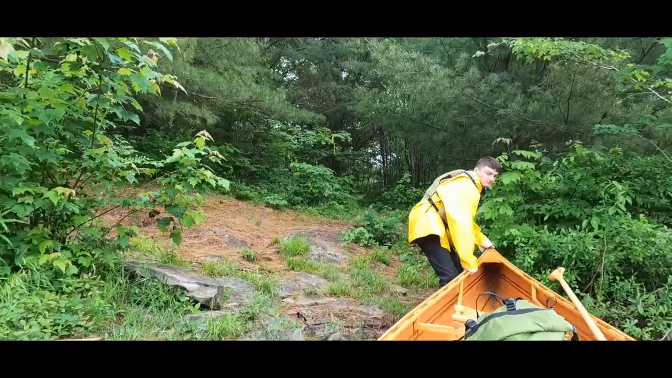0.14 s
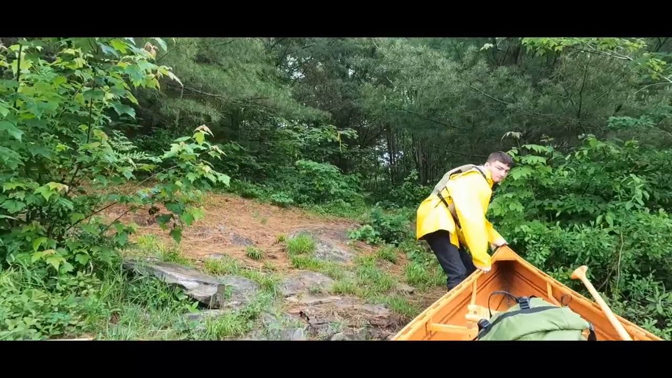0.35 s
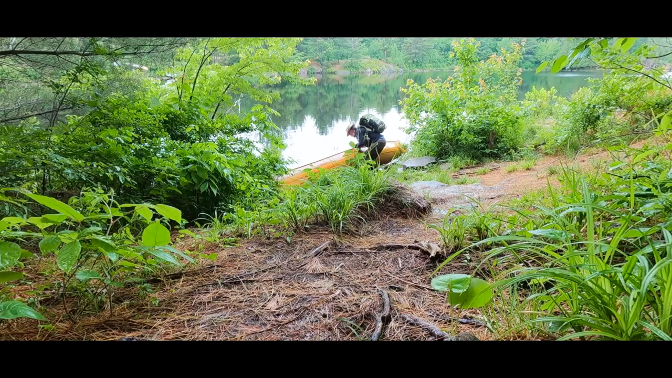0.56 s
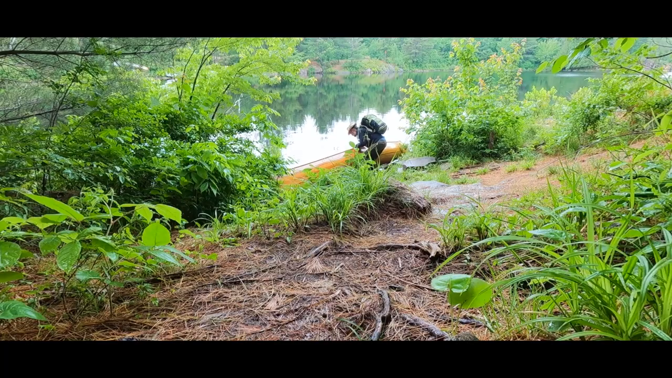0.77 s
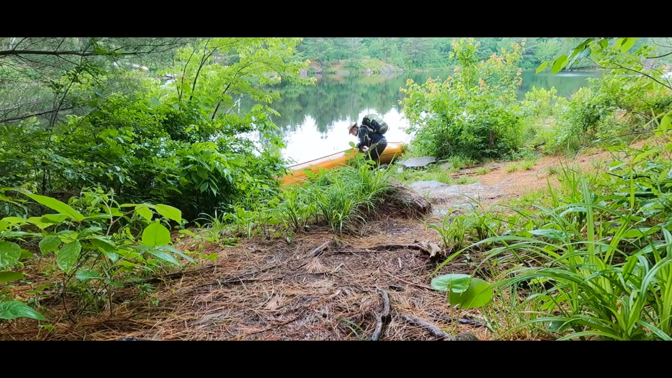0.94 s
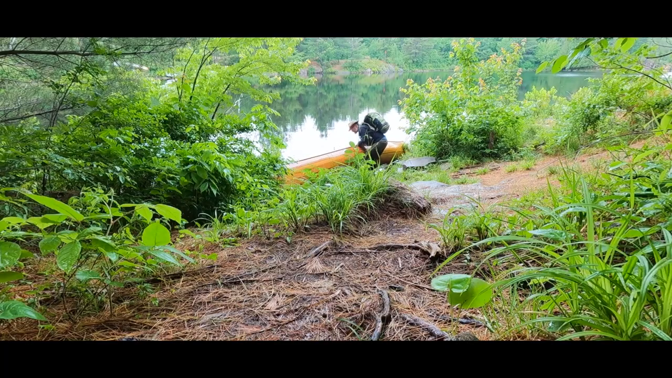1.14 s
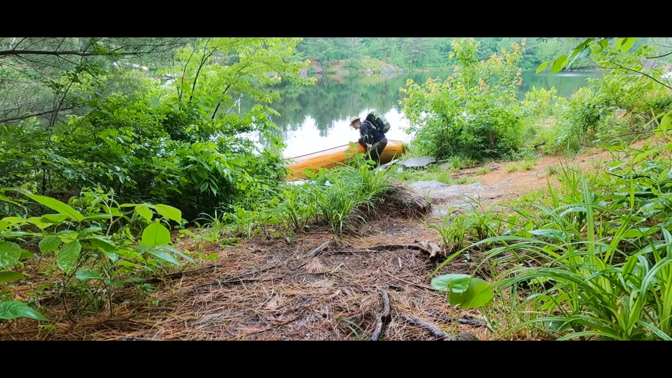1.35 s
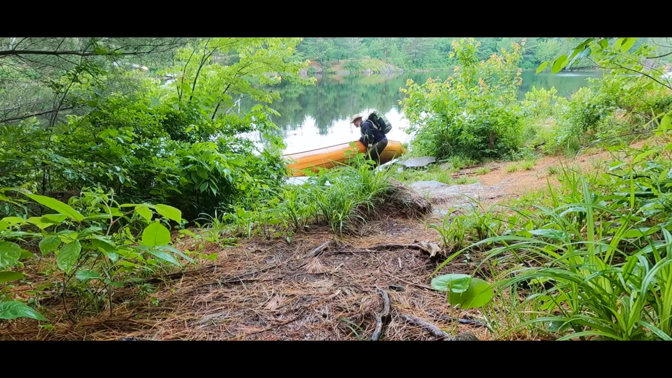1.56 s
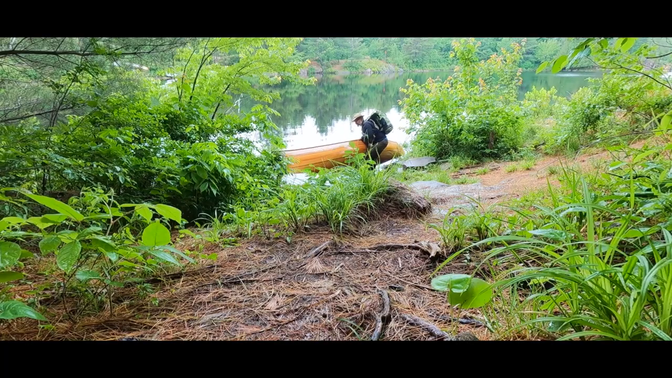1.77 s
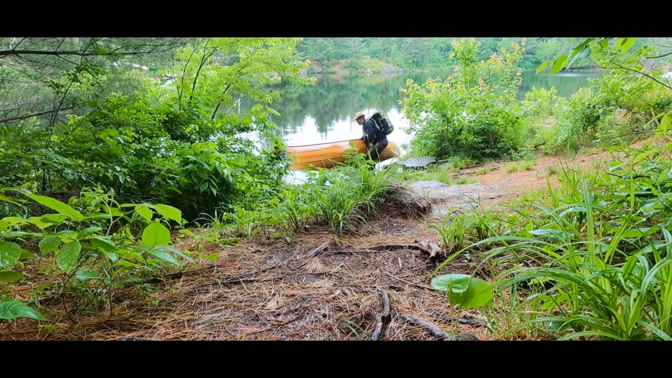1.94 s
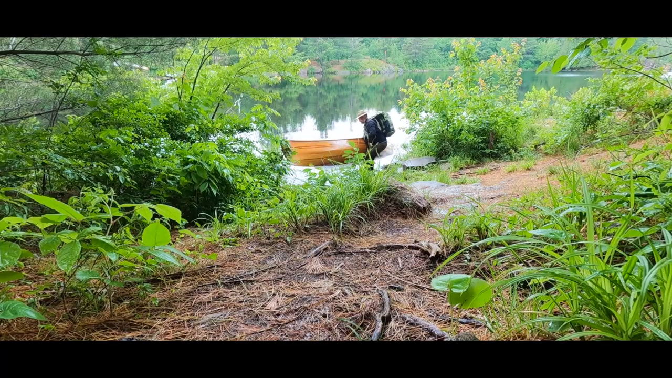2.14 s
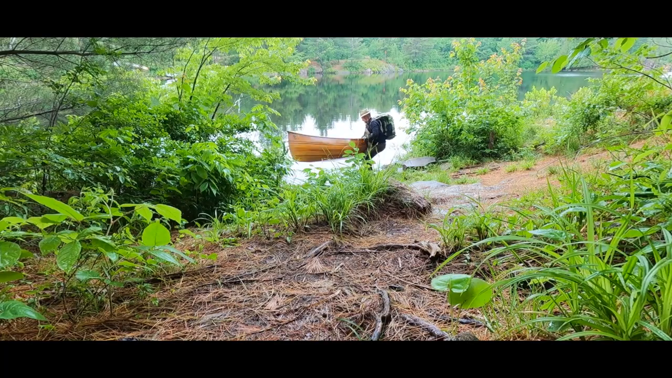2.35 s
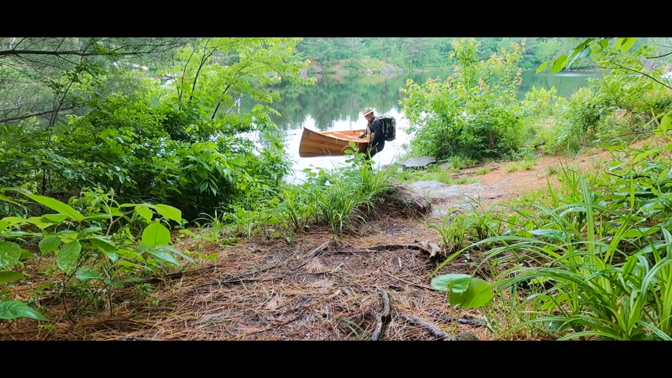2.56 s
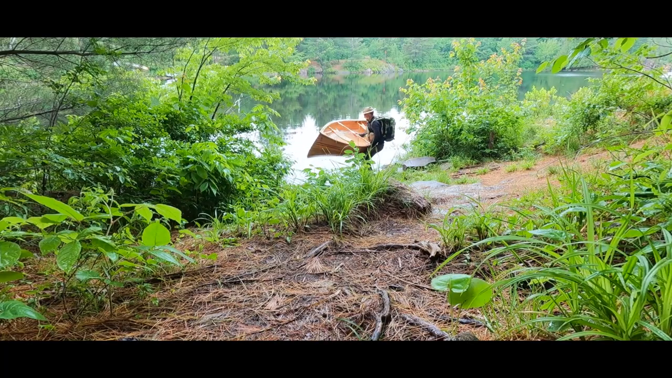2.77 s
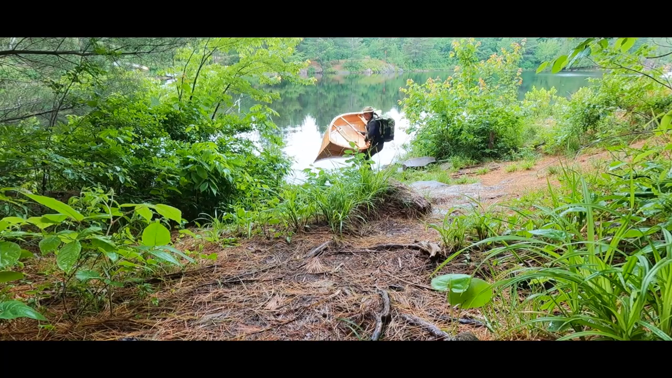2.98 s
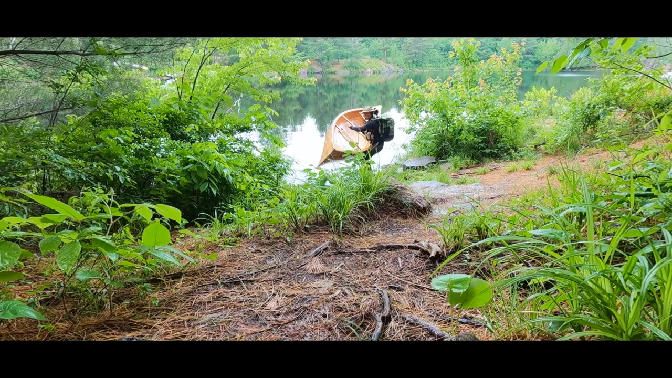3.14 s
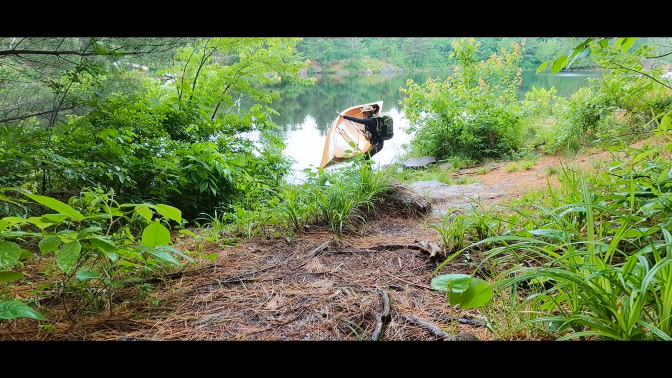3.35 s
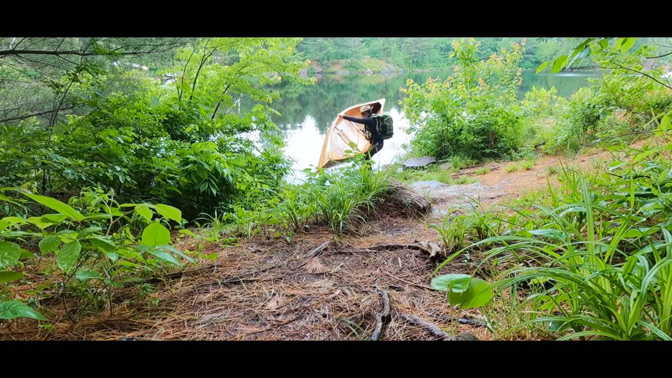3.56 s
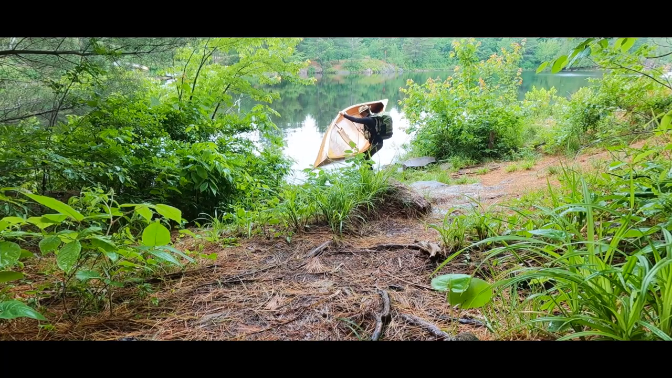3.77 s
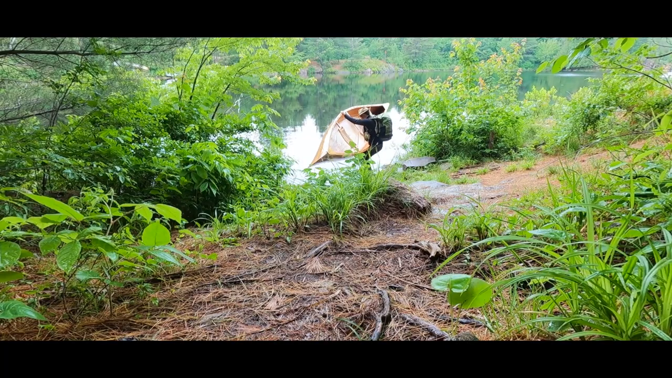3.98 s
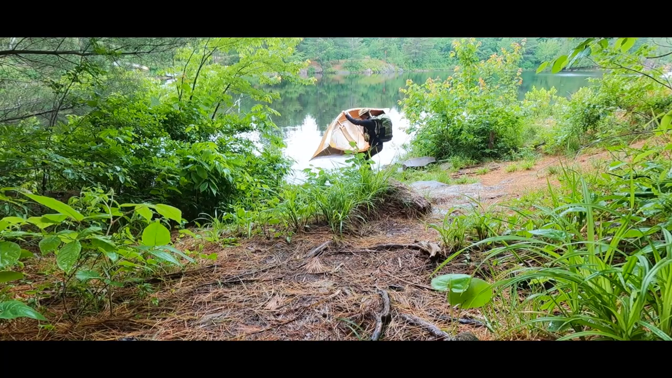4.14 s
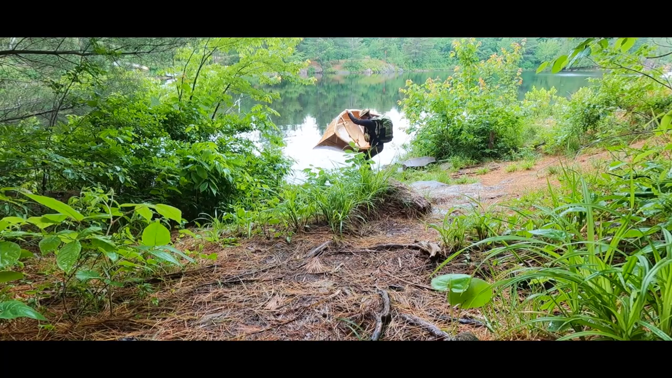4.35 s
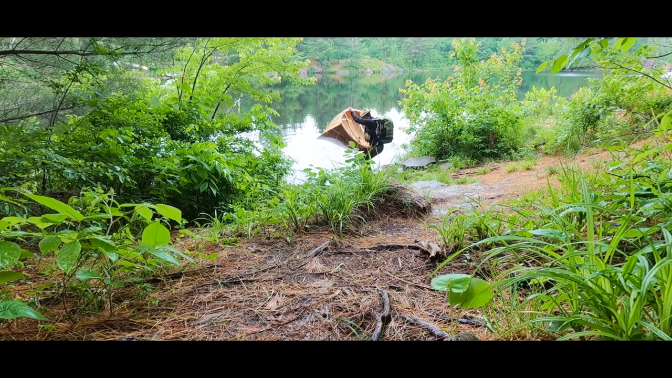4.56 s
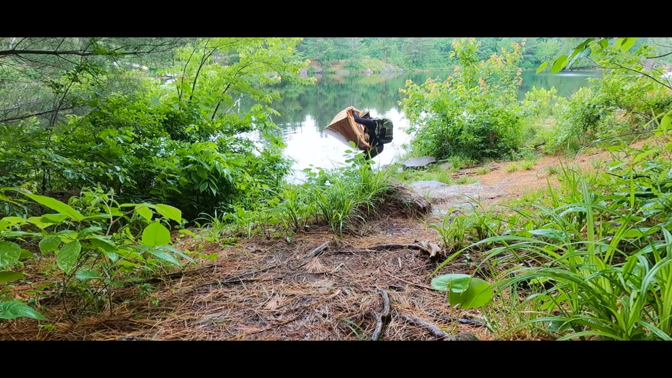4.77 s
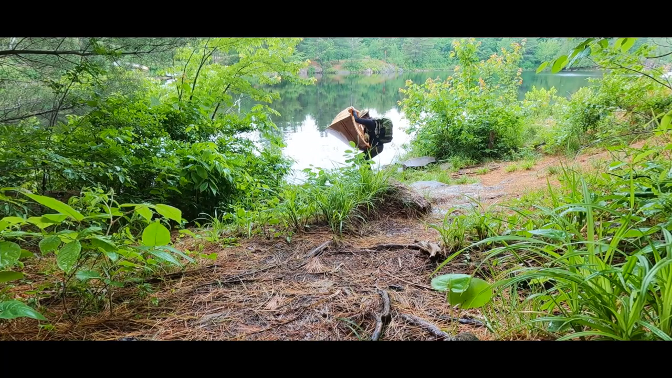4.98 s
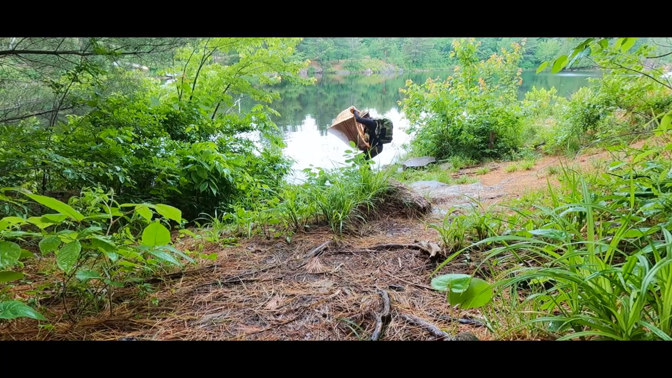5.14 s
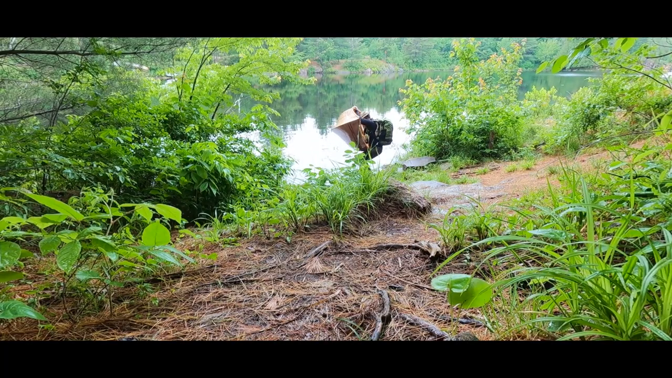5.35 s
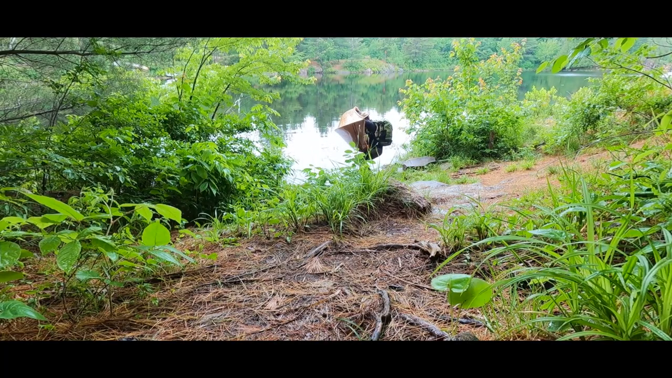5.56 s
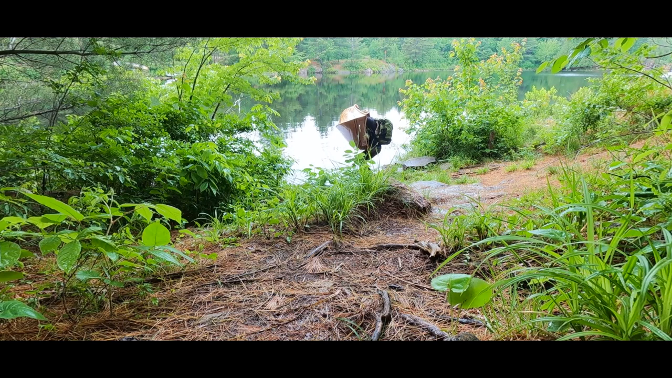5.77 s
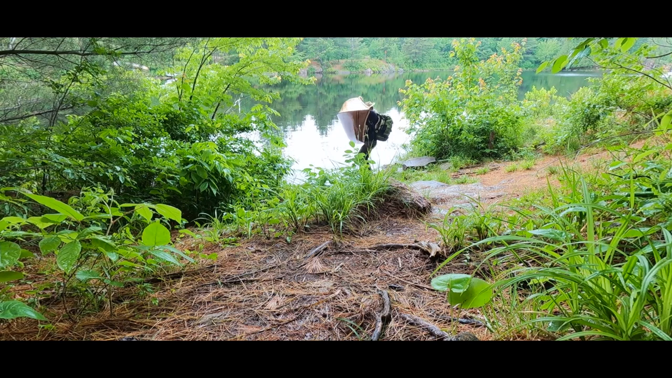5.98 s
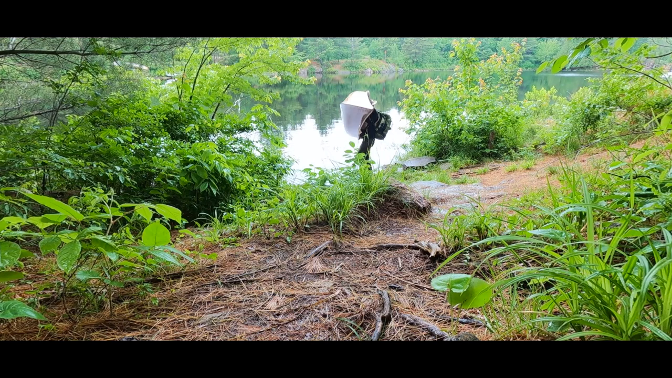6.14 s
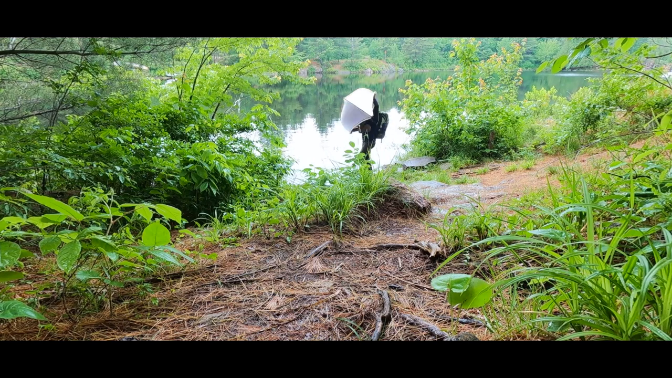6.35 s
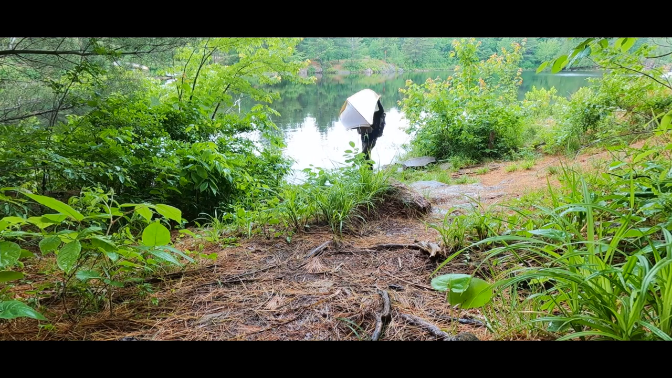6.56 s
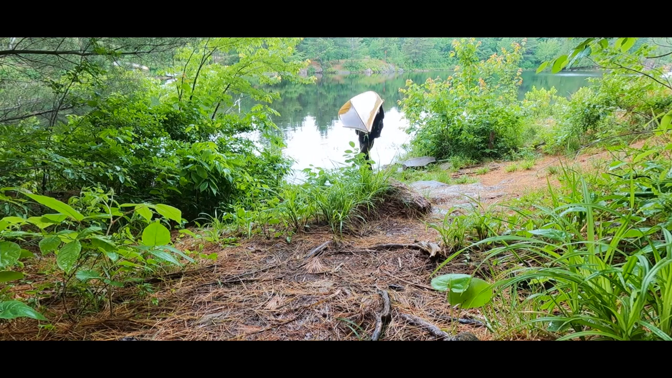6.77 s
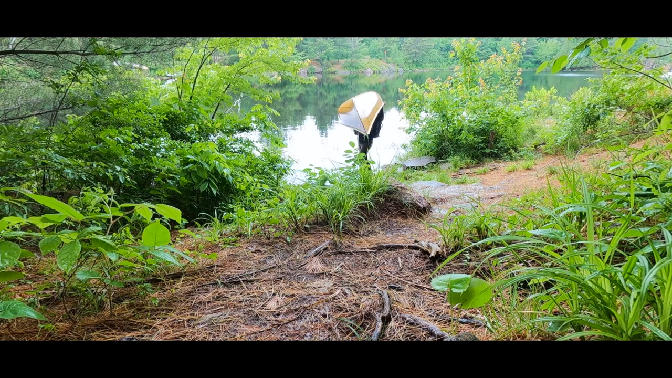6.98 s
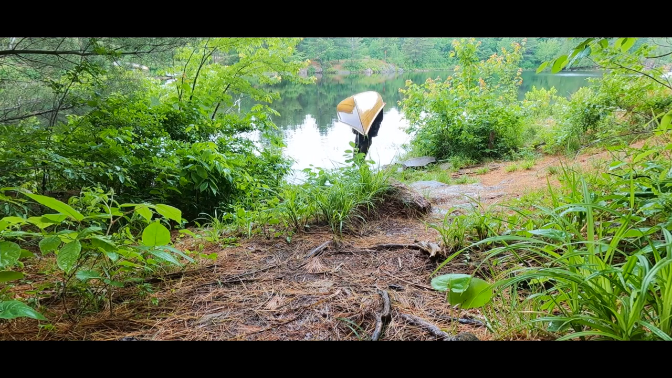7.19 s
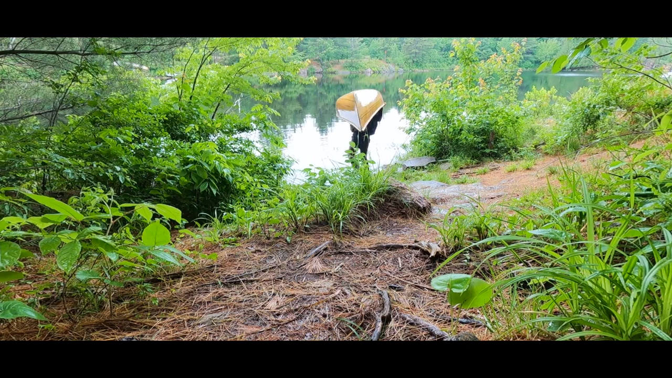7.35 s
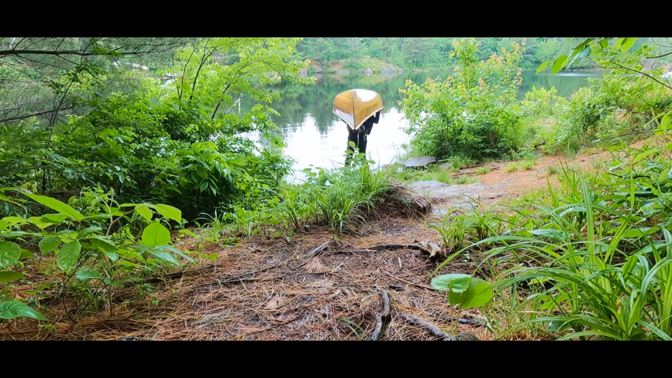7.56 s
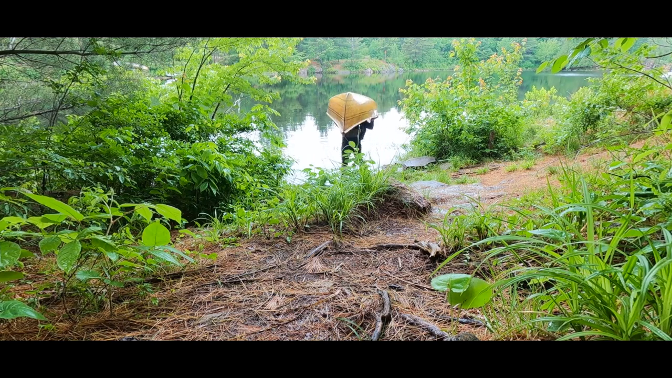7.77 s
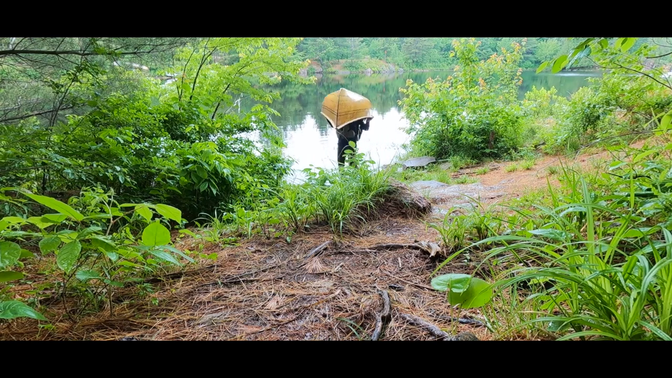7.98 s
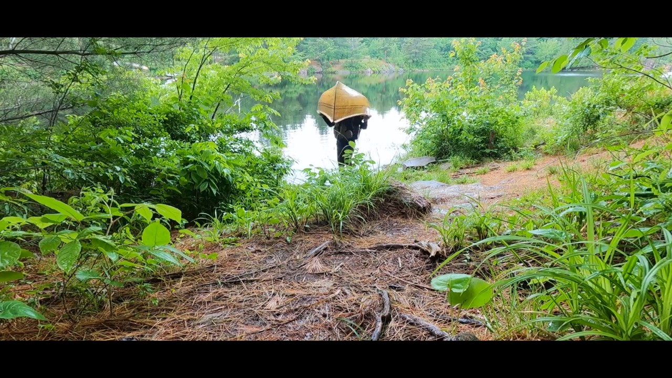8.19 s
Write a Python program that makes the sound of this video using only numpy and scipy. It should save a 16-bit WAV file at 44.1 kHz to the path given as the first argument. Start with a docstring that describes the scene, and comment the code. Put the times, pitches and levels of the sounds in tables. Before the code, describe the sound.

Close up, a wooden canoe thumps and grates over shore rock for half a second, then stops dead with a small click. Quieter lakeside air follows with birds and soft wavelets. A hollow thump, a burst of bubbling water, a grassy swish and a sharp loud knock come as the hull is lifted, then fainter thuds, hums and rustles. Outdoor stereo with faint hiss, canoe nearly centred.

```python
"""At once a wooden canoe bumps and grates on shore rock; after half a second that sound stops with a click.
Then the hull is hauled out of the lake and shouldered: bubbles slosh, gear and grass rustle, and blows boom
hollowly, thinning out towards the end. Birds and wavelets sound throughout. Blows are short swinging pushes
that ring the hull; water is many small bubble tones; birds are gliding whistles with echoes;
grating, grass, air and wavelets are coloured noise."""
import sys
import numpy as np
from scipy import signal
from scipy.fft import rfft, irfft, next_fast_len
from scipy.io import wavfile
from scipy.ndimage import uniform_filter1d, map_coordinates

SR = 44100
rng = np.random.default_rng(int(sys.argv[2]) if len(sys.argv) > 2 else 0)


def inscribe(sig):
    """Save sig as 16-bit PCM at rate SR to the path in sys.argv[1].

    A 1-D sig is mono; a 2-D sig holds one channel per row.
    Samples are clipped to [-1, 1] before scaling.
    """
    pcm = np.round(np.clip(np.atleast_2d(sig).T, -1, 1) * 32767)
    wavfile.write(sys.argv[1], SR, pcm.astype(np.int16))


N = 362502  # length in samples, about 8.2 s


def amp(db):
    """Turn decibels into gain."""
    return 10 ** (np.asarray(db) / 20)


def unit(x):
    """Scale to an rms of 1."""
    return x / np.sqrt(np.mean(x ** 2) + 1e-20)


def along(points, hz):
    """Read a curve of (Hz, value) points, joined by lines over a logarithmic pitch axis."""
    f, v = np.transpose(points)
    return np.interp(np.log(hz + 1), np.log(f + 1), v)


def level(rows):
    """Gain for every sample, from rows of time in seconds and level in dB."""
    return amp(np.interp(np.arange(N) / SR, *np.transpose(rows)))


def wobble(rate):
    """A smooth random curve through `rate` random points a second."""
    knots = rng.standard_normal(int(N * rate / SR) + 4)
    return map_coordinates(knots, [np.arange(N) * rate / SR])


def filtered(x, response):
    """Multiply the spectrum of x by a response that depends on frequency."""
    n = x.shape[-1]
    padded = next_fast_len(n + SR // 5)
    spectrum = rfft(x, padded) * response(np.fft.rfftfreq(padded, 1 / SR))
    return irfft(spectrum, padded)[..., :n]


def noise(spectrum, size=N):
    """Noise of rms 1, coloured by a curve of (Hz, dB) points."""
    return unit(filtered(rng.standard_normal(size), lambda hz: amp(along(spectrum, hz))))


def tail(decay, size=SR // 2):
    """A dense noisy ring of energy 1 in which each frequency dies away at its own speed."""
    hz, t, z = signal.stft(rng.standard_normal(size), SR, nperseg=256)
    fading = z * amp(-60 * t / along(decay, hz)[:, None])
    ring = signal.istft(fading, SR, nperseg=256)[1][:size]
    return ring / np.linalg.norm(ring)


def add(track, s, sound):
    """Mix a sound into the track from time s in seconds."""
    part = track[max(round(s * SR), 0):][:len(sound)]
    part += sound[:len(part)]


# How far the surroundings spread to the sides; long waves reach both ears nearly alike.
# Each row: frequency in Hz, relative level of the side signal in dB.
WIDTH = [(60, -17), (250, -4), (500, -5), (1000, -1.5), (2000, -3), (6000, -4)]


def wide(mid, side, side_db):
    """Make left and right by adding and subtracting a weaker side signal."""
    side = filtered(side, lambda hz: amp(side_db + along(WIDTH, hz)))
    return np.array([mid + side, mid - side])


def swoop(length, start_hz, middle_hz, end_hz, waver=.025):
    """One whistled syllable: a pure tone gliding through three pitches, a little unsteady."""
    u = np.linspace(0, 1, int(length * SR))
    hz = np.interp(u, [0, .5, 1], [start_hz, middle_hz, end_hz])
    hz = uniform_filter1d(hz, len(u) // 10, mode="nearest")  # round off the bend
    shake = rng.standard_normal(size=24)
    hz = hz * (1 + waver * np.interp(u, np.linspace(0, 1, len(shake)), shake))
    fade = np.minimum(1, 10 * np.minimum(u, 1 - u))
    return fade * np.sin(2 * np.pi * np.cumsum(hz) / SR)


# Echo of the woods, shorter for high sounds. Each row: frequency in Hz, time to fade by 60 dB in seconds.
WOODS = [(200, .6), (3000, 0.25), (8000, 0.11)]


def far_birds(pitch_hz=3050, spread=.15, blur_db=0, count=220):
    """Many distant syllables at random times, smeared by the echo of the woods."""
    song = np.zeros(N)
    timings = rng.random((count, 2))
    voices = rng.standard_normal((count, 5))
    for (when, span), (size, register, *turns) in zip(timings, voices):
        pitches = pitch_hz * np.exp(spread * (register / 2 + np.array(turns)))
        add(song, when * N / SR, amp(size) * swoop(.04 + 0.11 * span, *pitches))
    echoes = [signal.fftconvolve(song, tail(WOODS))[:N] for ear in range(2)]
    return unit(song + amp(blur_db) * wide(*echoes, side_db=-12.5))


# Colour of the still air. Each row: frequency in Hz, relative level in dB.
AIR = [(15, -35), (25, -15), (102, -5.5), (169, -4.5), (299, -13.5), (391, -7), (688, -12.5), (1630, -14.5),
       (2020, -14), (2650, -9.5), (3290, -13), (4300, -16.5), (6280, -22.5), (14500, -31), (15700, -33.5)]
# Wavelets on the shore. Each row: time in seconds, level in dB before its random wobble.
LAP = [(.5, -58), (.7, -53.5), (1.45, -52), (1.8, -60), (2.6, -51.5), (3.1, -56.5), (3.3, -65.5),
       (5.3, -60.5), (6.1, -56.5), (7.3, -67), (7.8, -59)]
# Colour of the wavelets. Each row: frequency in Hz, relative level in dB.
WAVELETS = [(60, -7.5), (120, -9.5), (165, 6.5), (250, 0), (450, -8.5), (800, -20.5), (2000, -50)]
# Swells of the distant birds. Each row: centre in seconds, swell in dB before the mix of song and haze.
CHORUS = [(.9, -61.5), (2.3, -63.5), (3.35, -64), (4.3, -64), (5.0, -62), (6.15, -62), (6.75, -68),
          (7.2, -74)]
# Colour of the blurred far birdsong. Each row: frequency in Hz, relative level in dB.
FAR_SONG = [(1500, -38), (2100, -8.5), (2550, 12), (3300, 14.5), (4200, -23), (5500, -23.5), (8000, -67)]
CHORUS_SWELL_S, CHORUS_REST_DB = 0.13, -71  # spread (sigma) of a swell; level between swells, before the mix


def lakeside(air_db=-59.5, lap_db=0, chorus_db=-4.5, haze_db=-7):
    """Still air, lapping wavelets and a haze of far birdsong, all noise, under swelling far birds."""
    air = amp(air_db) * wide(noise(AIR), noise(AIR), side_db=-11.0)
    lap_gain = level(LAP) * amp(lap_db + 3.3 * wobble(6.7))
    lap = lap_gain * wide(noise(WAVELETS), noise(WAVELETS), side_db=-9)
    haze = amp(haze_db) * wide(noise(FAR_SONG), noise(FAR_SONG), side_db=-32.0)
    t = np.arange(N) / SR
    swells = amp(CHORUS_REST_DB)
    for s, db in CHORUS:
        swells = swells + amp(db) * np.exp(-.5 * ((t - s) / CHORUS_SWELL_S) ** 2)
    return air + lap + swells * (amp(chorus_db) * far_birds() + haze)


SWING_OCTAVES, NOTE_EDGE_S = .35, 0.0058  # reach of a warble either side of its centre; fade in and out


def warble(length, rate, centre_hz, waver=0.0242, sharp=.9):
    """A whistle whose pitch swings down and up about its centre, with quick turns."""
    t = np.arange(int(length * SR)) / SR
    # near 1 the swing is a zigzag, near 0 a smooth wave; it starts at the top
    swing = np.arcsin(sharp * np.cos(2 * np.pi * rate * t)) / np.arcsin(sharp)
    shake = np.interp(t, np.linspace(0, length, num=32), rng.standard_normal(size=32))
    hz = centre_hz * 2 ** (SWING_OCTAVES * swing) * (1 + waver * shake)
    fade = np.minimum(1, np.minimum(t, length - t) / NOTE_EDGE_S)
    return fade * np.sin(2 * np.pi * np.cumsum(hz) / SR)


# Phrases of the nearest songbird, each falling from the top of its swing.
# Each row: start in seconds, length in seconds, swings per second, centre pitch in Hz, level in dB before the mix.
SONG = [(0.262, .1, 5.7, 2980, -59), (1.066, 0.16, 4.9, 2880, -55.5), (1.697, 0.1, 6.4, 3210, -60),
        (1.848, 0.11, 10.6, 2946, -52.5), (2.473, .14, 7.1, 2990, -57), (3.268, 0.17, 8.5, 2700, -59.5),
        (3.487, 0.073, 8.2, 2980, -56), (3.874, 0.12, 2.1, 1745, -65), (4.132, 0.23, 6.75, 2974, -58),
        (4.385, 0.13, 8, 3270, -58.5), (4.716, 0.17, 6.6, 3057, -62), (4.945, 0.062, 8.4, 3500, -58),
        (5.514, .07, 6.1, 3600, -58.5), (5.609, .1, 11.5, 3185, -55), (6.295, .125, 7.9, 2767, -55.5),
        (6.971, 0.13, 9.9, 3186, -53), (7.157, 0.14, 14, 2850, -51.5), (7.517, 0.12, 0.72, 1705, -65.5),
        (7.946, 0.071, 14.3, 3240, -51), (8.012, 0.19, 7.75, 2894, -50.5)]
# A second bird's thin gliding chips; a negative fall rises.
# Each row: start in seconds, middle pitch in Hz, fall in octaves, level in dB before the mix.
CHIPS = [(0.491, 3780, .5, -62), (0.979, 4640, 0.038, -64), (2.38, 4400, -.2, -60),
         (3.098, 5540, -0.12, -64), (3.39, 3130, 0, -55.5), (3.71, 3930, 0.12, -65.5),
         (4.32, 3480, .5, -56), (4.82, 3710, 0.48, -58.5), (5.1, 4030, .2, -60.5),
         (5.229, 3870, 0.42, -59.5), (5.32, 4360, 0, -60.5), (6.27, 3550, -.3, -57.5),
         (6.56, 2730, 0.23, -61), (6.81, 5400, 0.016, -63), (6.955, 4700, .2, -69), (7.349, 3100, .4, -59),
         (7.459, 3100, .4, -60)]
CHIP_LENGTH_S = .055  # all chips are equally short


def bird(direct_db=-2, trunks_db=-6, echo_db=-5, flutter_db=2):
    """Warbles and thin chips, smeared by the nearest trunks and trailed by the echo of the woods."""
    song = np.zeros(N)
    for s, length, rate, centre_hz, db in SONG:
        add(song, s, amp(db) * warble(length, rate, centre_hz))
    for s, hz, fall, db in CHIPS:
        pitches = hz * 2 ** (fall * np.array([.5, 0, -.5]))
        add(song, s, amp(db) * swoop(CHIP_LENGTH_S, *pitches))
    song *= amp(flutter_db * wobble(90))
    echoes = []
    for ear in range(2):
        woods = amp(echo_db) * tail(WOODS)
        trunks = amp(trunks_db) * tail([(200, .08), (8000, 0.018)])  # (Hz, seconds to fade by 60 dB)
        echoes.append(signal.fftconvolve(song, woods + trunks)[:N])
    return amp(direct_db) * song + wide(*echoes, side_db=-16)


# The hull brushing through grass. Each row: time in seconds, level in dB before SLIDE_DB is added.
SLIDE = [(0.5, -78), (0.77, -87), (0.98, -71), (2.12, -67.5), (2.63, -73), (2.65, -58.5), (2.9, -90)]
SLIDE_DB = 6  # lifts the whole swish
# Colour of the grass. Each row: frequency in Hz, relative level in dB.
GRASS = [(400, -21), (1200, -6), (3000, 10.5), (4500, 5.5), (6000, 5.5), (7700, 4.5), (9000, -8),
         (14000, -27)]
# Gear and twigs rustling.
# Each row: centre in seconds, level in dB, rise and fall time in seconds, middle of its band in Hz.
RUSTLES = [(.025, -76, 0.0067, 5900), (1.727, -66.5, .02, 13000), (2.66, -51.5, 0.005, 6300),
           (4.358, -58, .008, 5330), (4.618, -62, .016, 8800), (4.94, -63.5, .017, 8650),
           (5.068, -62, 0.0077, 7950), (5.261, -62, .012, 8460), (5.723, -61, .015, 8900),
           (6.202, -63, 0.026, 6500), (6.5, -68, 0.027, 11800), (6.907, -64.5, 0.017, 9940)]


def rustles(grain_db=3, width_octaves=0.33):
    """Grass, straps and twigs: bands of noise made crackly by a fast random wobble in level."""
    out = amp(SLIDE_DB) * level(SLIDE) * unit(noise(GRASS) * amp(2.0 * wobble(100)))
    t = np.arange(SR // 2) / SR - 1 / 4
    grains = amp(grain_db * wobble(400))[:len(t)]
    for s, db, length, hz in RUSTLES:
        band = lambda f: np.exp(-.5 * (np.log2((f + 1) / hz) / width_octaves) ** 2)
        swish = unit(filtered(rng.standard_normal(len(t)) * grains, band))
        add(out, s - 1 / 4, amp(db) * swish * np.exp(-abs(t) / length))
    return out


def bubble(hz, life_cycles=16, rise=0.02):
    """A pocket of air rings softly, swelling and fading as its pitch rises a little."""
    cycles = np.arange(int(5 * life_cycles * SR / hz)) / SR * hz
    age = cycles / life_cycles
    envelope = 2 * age * np.exp(1 - 2 * age)
    return envelope * np.sin(2 * np.pi * cycles * (1 + rise * age))


# Wash of bubbles under the hull. Each row: time in seconds, level in dB.
SLOSH = [(.5, -69), (1.2, -58), (1.351, -45), (1.6, -68.5), (2.6, -69), (2.8, -97.5)]
# Single gurgling pockets of air. Each row: start in seconds, level in dB, pitch in Hz.
GURGLES = [(1.305, -44.5, 956), (1.355, -46, 486), (1.37, -45.5, 380), (1.39, -54, 1076),
           (1.415, -43.5, 659), (1.47, -51, 577)]


def slosh(pitch_hz=620, spread_octaves=1, count=3500):
    """A wash of many small bubbles and a few gurgles as the hull leaves the water."""
    water, end = np.zeros(N), SLOSH[-1][0]
    for when, pitch, size in rng.random((count, 3)):
        hz = pitch_hz * 2 ** (spread_octaves * (2 * pitch - 1))
        add(water, when * end, size * bubble(hz, life_cycles=8.3))
    water = level(SLOSH) * water / np.std(water[:round(end * SR)])
    for s, db, hz in GURGLES:
        add(water, s, amp(db) * bubble(hz))
    return water


# Colour of the dense plank ringing. Each row: frequency in Hz, relative level in dB.
PLANKS = [(40, -39.5), (150, 8.5), (500, -8), (1200, 0.5), (2500, -32), (8000, -4.5)]
# How long the planks ring. Each row: frequency in Hz, time to fade by 60 dB in seconds.
PLANK_DECAY = [(60, 0.14), (200, 0.47), (500, 0.27), (1200, 0.33), (4000, .25)]


def knock(hz, swell, ring_db, hull, modes_db=-3, planks_db=-3, scatter_db=0.5, lowest=0.34):
    """The struck planks swing for a few cycles and set the whole hull ringing."""
    t = np.arange(SR // 2) / SR
    age = t * hz / max(swell, .2)  # the push is strongest at age 1
    push = age * np.exp(1 - np.minimum(age, 100)) * np.sin(2 * np.pi * hz * t)
    # planks radiate little below their pitch
    push = signal.lfilter(*signal.butter(2, lowest * hz, "high", fs=SR), push)
    gains = amp(scatter_db * rng.standard_normal(len(hull)))
    phases = np.exp(2j * np.pi * rng.random(len(hull)))
    modes = ((gains * phases) @ hull).real
    planks = filtered(tail(PLANK_DECAY), lambda f: amp(along(PLANKS, f)))
    spreading = 1 - np.exp(-t / 0.007)  # the wave takes time to spread along the hull
    sound = push
    for body, db in (modes, modes_db), (planks, planks_db):
        ring = signal.fftconvolve(push[:SR // 6], body * spreading)[:len(t)]
        ring = ring * np.linalg.norm(push) / np.linalg.norm(ring)  # as strong as the push
        sound = sound + amp(ring_db + db) * ring
    return sound


RIB_RATIO, RIB_LAG_S, RIB_RING_DB = 1.95, 0.00501, 1  # ribs: pitch over the planks', delay, ring before trims
REBOUND_S, REBOUND_LOSS_DB = .02, 4.5  # average time between contacts; level lost from one to the next
SETTLE_HZ, PITCH_KEPT = 128.6, 0.55  # pitch of the broad bottom planks; share of the gap left each time


def blow(hz, swell, ring_db, rib_db, rebound_db, hull, rebound_cycles=0.63, rebound_ring_db=-6,
         uneven=0.069, count=3):
    """Struck planks, stiff ribs nearly an octave higher, then ever weaker rebounds nearing the bottom's pitch."""
    sound = np.zeros(SR * 3 // 4)
    add(sound, 0, knock(hz, swell, ring_db, hull))
    add(sound, RIB_LAG_S, amp(rib_db) * knock(RIB_RATIO * hz, 0.75, RIB_RING_DB, hull))
    for k, early_late in enumerate(rng.standard_normal(count)):
        hz = SETTLE_HZ * (hz / SETTLE_HZ) ** PITCH_KEPT
        contact = knock(hz, rebound_cycles, rebound_ring_db, hull)
        when = REBOUND_S * (k + 1 + uneven * early_late)
        add(sound, when, amp(rebound_db - k * REBOUND_LOSS_DB) * contact)
    return sound


# Blows on the wooden hull. Each row: start in seconds, level in dB, pitch of the struck planks in Hz,
# cycles to swell, hull ring in dB before trims, level of the ribs in dB, level of the first rebound in dB.
KNOCKS = [(0.012, -4.5, 185.7, 0.97, -7.5, -31, -20), (.092, -18, 118, 0.39, 2.5, -12, -2.5),
          (.21, -26.5, 154, 2, -2, -11, -12), (.332, -17, 184, 1.23, -11, -14.5, -3),
          (.359, -3, 269, 0.36, -9, -13.5, -8), (0.453, -13, 297, 0.44, -4.5, -15.5, -8),
          (1.097, -16, 246, 0.9, -3, -11, 0), (1.199, -34, 115.5, 1.5, 3.5, -27, -10),
          (2.662, -26, 520, 0.32, 1.5, -16, -20), (2.715, -4.5, 470, 0.39, 1.5, -23, -10),
          (2.863, -29.5, 231, 1.07, 2.5, 1.5, 0), (3.041, -39, 335, 0.55, 4, -7, -7),
          (3.532, -27.5, 181, 0.9, -4, -16, -10), (3.55, -22.5, 226, 0.5, 3, -1.5, -5),
          (5.463, -34.5, 285, 1.3, 1.5, -6.5, -10), (5.479, -15, 193, 1.03, -8.5, -7.5, -18),
          (5.517, -38, 232, 0.33, -7, 0, 1), (6.446, -30.5, 211, 1.1, 1.5, -2.5, -9),
          (7.832, -36, 229, 0.4, -3, -6, -11), (7.99, -35, 223, 0.44, -10, -3.5, -18)]
# Tones of the hollow hull. Each row: pitch in Hz, relative level in dB, time to fade by 60 dB in seconds.
HULL = [(64, 26.5, 0.2), (82.9, 5.5, 0.93), (120, 3.5, 0.35), (143, -1.5, 0.876), (166.8, 1, 0.16),
        (197, -15.5, 0.27), (229.7, 7.5, 0.19), (259.4, -6.5, 0.47), (281.3, 14, 0.28), (338.5, 15, 0.27),
        (401.4, 9, 0.21), (415, -0.5, 0.28), (459, -4.5, 0.39), (517, 1, 0.45), (574, 0, 0.36),
        (685, -3, 0.33), (757, 11, 0.23), (855, -8, 0.33), (988, 15, 0.21), (1262, -11.5, .25),
        (1519, -47, 0.22)]
# The weight of the whole hull landing. Each row: start in seconds, level in dB, pitch in Hz.
THUDS = [(.03, -24, 60), (.165, -41, 70), (0.379, -27, 70), (1.129, -28, 72), (1.215, -41, 71.6),
         (2.74, -35, 91), (3.578, -32, 78), (5.499, -31.5, 88), (7.866, -47, 90)]
THUD_CYCLES, THUD_RING_DB = 0.67, -4  # cycles to swell; hull ring before trims
# The hull flexing under its load with a soft hum. Each row: start in seconds, level in dB, pitch in Hz.
FLEXES = [(0.561, -39.5, 153.6), (0.701, -44, 220), (1.3, -39, 120), (2.38, -45, 220), (2.49, -41.5, 245),
          (3.48, -44.5, 187), (4.151, -42.5, 216), (4.348, -49, 229), (5.099, -46.5, 170),
          (5.67, -48.5, 330), (5.94, -46, 159), (6.191, -48.5, 153), (6.425, -45, 176), (7.643, -53, 194)]
FLEX_CYCLES, FLEX_RING_DB = 1.8, 0.5  # cycles to swell; hull ring before trims
# Hard clacks of wood. Each row: start in seconds, level in dB, time to fade by 60 dB in seconds.
CLACKS = [(.012, -36.5, 0.31), (0.0722, -23, 0.051), (.083, -29.5, 0.052), (.186, -33.5, 0.1),
          (.348, -26, 0.085), (.408, -37.5, 0.063), (1.094, -43, .2), (1.316, -41.5, 0.045),
          (2.716, -42, 0.43), (2.982, -52, 0.047), (3.528, -52, 0.1), (3.543, -40, 0.18),
          (3.953, -48.5, .04), (4.614, -54, 0.092), (5.672, -56.5, 0.15), (5.742, -50, 0.11),
          (6.19, -58.5, 0.28)]
# Colour of the clacks. Each row: frequency in Hz, relative level in dB.
CLACK = [(200, 2.5), (700, 13), (1000, 6.5), (1550, 8.5), (2400, -0.5), (3500, -6), (6000, -16.5),
         (9000, -43), (15000, -83.5)]
# The keel grating on rock. Each row: time in seconds, level in dB.
GRATE = [(0, -40), (.03, -26), (.11, -33), (.16, -41), (.23, -31), (.3, -39.5), (.34, -31), (.38, -32.5),
         (.47, -29.5)]
# Colour of the grating. Each row: frequency in Hz, relative level in dB.
GRIT = [(15, -43), (25, 5.5), (174, -0.5), (231, 1), (314, 0.5), (631, -18.5), (718, -8), (1030, -26),
        (1270, -17.5), (1770, -26), (3560, -38), (5120, -44), (12000, -60), (15600, -101), (22000, -120)]
BREAK_S = .473  # sounds begun before this moment stop here


def canoe(grit_db=3, fade_s=0.0002, contact_s=0.00035, click_db=-32):
    """Ringing booms, noisy clacks and a grating keel; the earliest sounds stop together with a click."""
    early, late, t = np.zeros(N), np.zeros(N), np.arange(SR // 2) / SR
    hull = np.array([amp(db - 60 * t / t60) * np.exp(2j * np.pi * hz * t) for hz, db, t60 in HULL])
    for s, db, *contact in KNOCKS:
        add(early if s < BREAK_S else late, s, amp(db) * blow(*contact, hull))
    for s, db, hz in THUDS:
        thud = knock(hz, THUD_CYCLES, THUD_RING_DB, hull)
        add(early if s < BREAK_S else late, s, amp(db) * thud)
    for s, db, hz in FLEXES:
        add(late, s, amp(db) * knock(hz, FLEX_CYCLES, FLEX_RING_DB, hull))
    for s, db, t60 in CLACKS:
        envelope = amp(db - 60 * t / t60) * (1 - np.exp(-t / contact_s))
        add(early if s < BREAK_S else late, s, envelope * noise(CLACK, size=len(t)))
    # the keel catches and slips on the grain of the rock
    slips = rng.standard_normal(N) * amp(grit_db * wobble(153))
    early += level(GRATE) * unit(filtered(slips, lambda hz: amp(along(GRIT, hz))))
    add(late, BREAK_S, amp([click_db]))  # a click of one sample
    stop = np.clip((BREAK_S - np.arange(N) / SR) / fade_s, 0, 1)
    return early * stop + late


# Sound thrown sideways by rock and ground. Each row: frequency in Hz, side level in dB.
SCATTER = [(60, -38), (200, -38), (380, -30), (700, -22), (1300, -15), (2400, -15), (8000, -17)]
# The canoe lies a little to the right. Each row: frequency in Hz, left level minus right level in dB.
LEAN = [(60, -.02), (125, -.18), (250, -.4), (500, -.8), (1000, -1.5), (2500, -.4), (6000, 0)]


def scene():
    """The canoe lies almost straight ahead; rock and ground scatter its sound to the sides."""
    boat = canoe() + slosh() + rustles()
    # random phases smear the sound in time without colouring it
    ground = irfft(np.exp(1j * np.angle(rfft(rng.standard_normal(SR // 40)))))
    smeared = signal.fftconvolve(boat, ground)[:N]
    side = filtered(smeared, lambda hz: amp(along(SCATTER, hz)))
    pair = np.array([boat + side, boat - side])
    pair = filtered(pair, lambda hz: amp(np.outer([.5, -.5], along(LEAN, hz))))
    return pair + bird() + lakeside()


TOP_HZ = 15780  # band limit


def record(dry, hiss_db=-77):
    """The microphone adds a faint hiss of bright noise; nothing is kept above the band limit."""
    bright = [(5000, -27), (11000, -7.5), (15500, -2.0)]  # (Hz, relative dB)
    hiss = amp(hiss_db) * wide(noise(bright), noise(bright), side_db=-12.0)
    return filtered(dry + hiss, lambda hz: hz < TOP_HZ)


dry = scene()
out = record(dry)
inscribe(out)
```